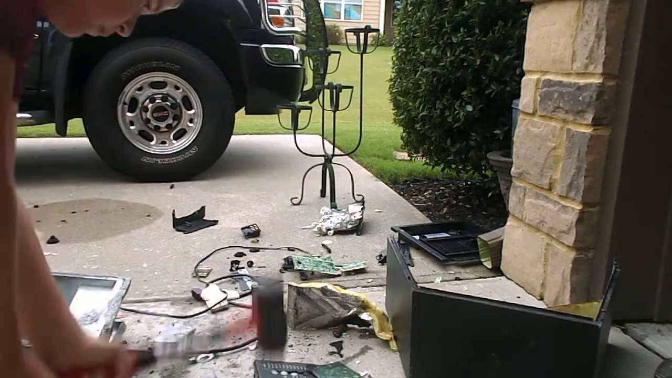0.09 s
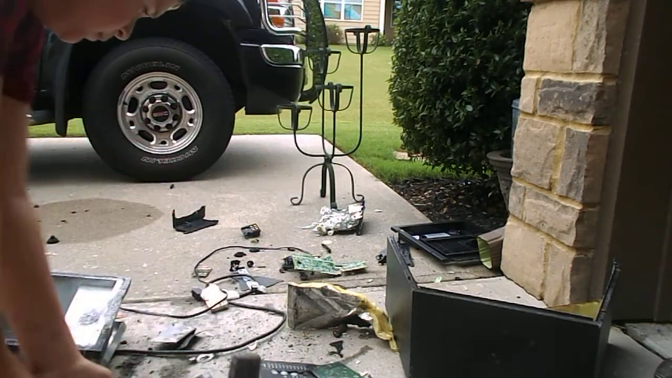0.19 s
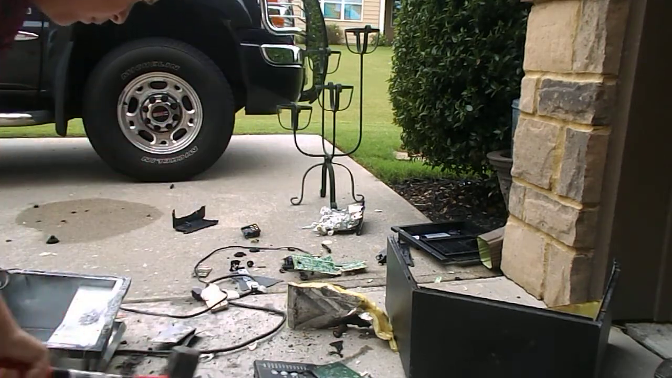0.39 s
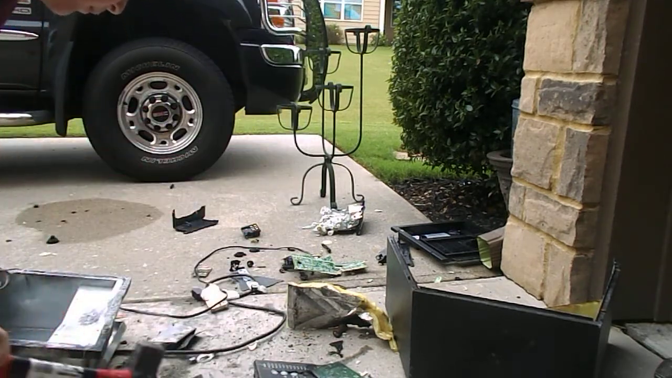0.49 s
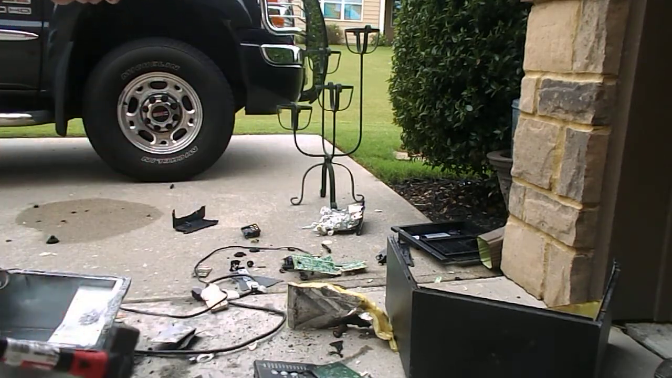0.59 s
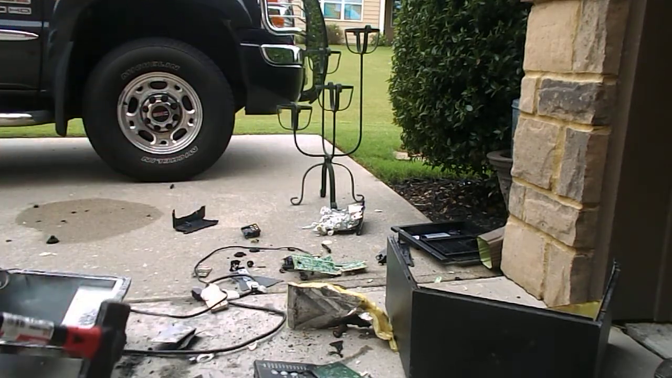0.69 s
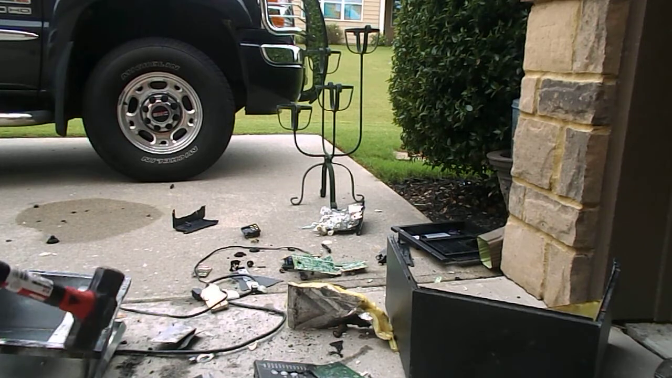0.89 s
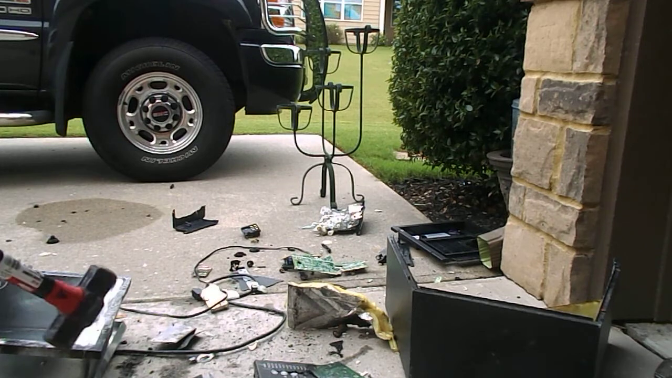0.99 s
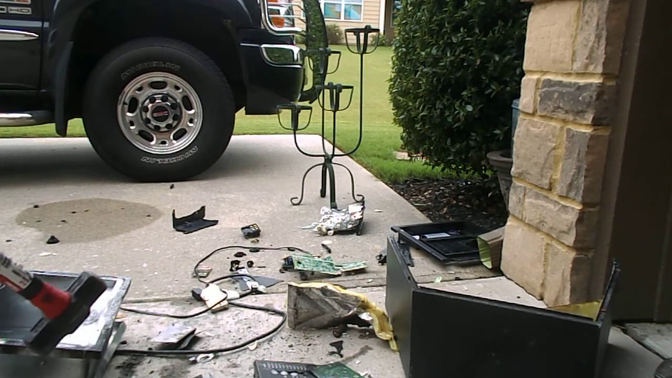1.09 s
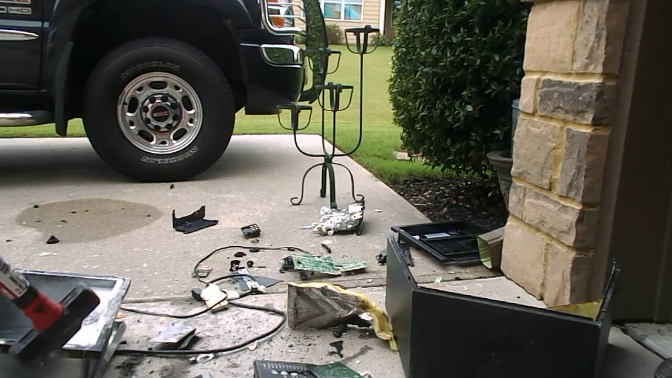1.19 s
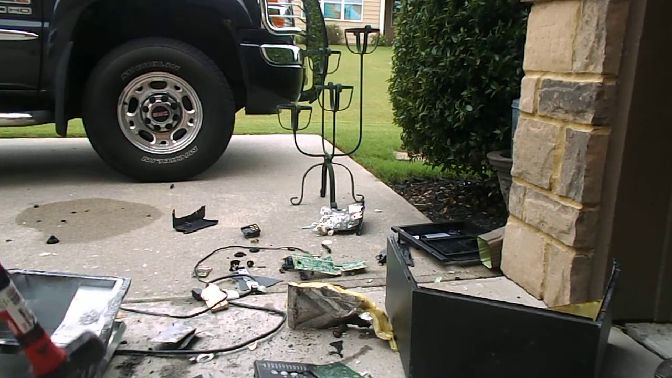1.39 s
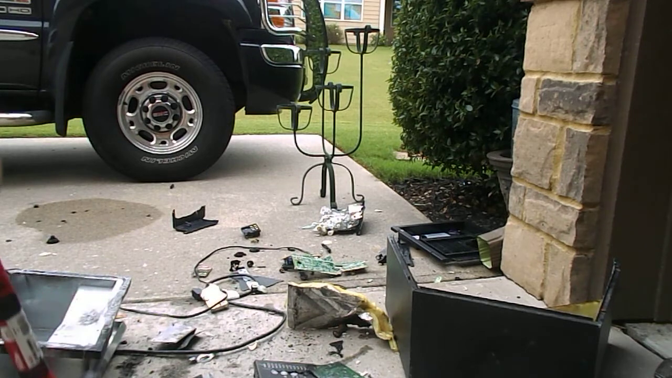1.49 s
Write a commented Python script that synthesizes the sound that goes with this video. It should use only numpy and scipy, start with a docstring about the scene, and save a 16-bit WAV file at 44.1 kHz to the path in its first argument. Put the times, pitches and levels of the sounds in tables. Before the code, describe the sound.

One harsh overloaded hammer blow on sheet metal, then jangling loose parts, over a faint engine idle

```python
"""An engine idles nearby under outdoor hiss and a faint insect band: wavering orders, a hum, coloured noise.
At the start the ring of an earlier blow fades (decaying noise and tones), with one faint knock.
Then a sledgehammer lands on a thin metal housing on concrete: crack, thud and ring, driven into overload.
The housing and loose parts skid and rattle (dense random contacts through the housing's response),
knock (filtered bursts) and ring out; a few faint knocks follow."""
import sys
import numpy as np
from scipy import signal
from scipy.fft import rfft, irfft
from scipy.io import wavfile

SR = 44100
rng = np.random.default_rng(int(sys.argv[2]) if len(sys.argv) > 2 else 0)


def output_pcm(signal):
    """Save a mono or channel-first signal as 16-bit PCM at the path in sys.argv[1].

    Samples are clipped to [-1, 1] before scaling.
    """
    pcm = np.clip(np.atleast_2d(signal).T, -1, 1) * 32767
    wavfile.write(sys.argv[1], SR, np.round(pcm).astype(np.int16))


N = 68355

# background
AIR_DB, AIR_WAVER_DB = -56, 1.3
INSECT_HZ, INSECT_Q, INSECT_DB, INSECT_SWELL_DB = 3900, 12.0, -70, 3.5
ENGINE_HZ, ENGINE_WAVER_DB, HUM_HZ = 23.98, 4, 97.5
EARLIER_DB, EARLIER_T60_S = -44, 0.32
# housing
SPOTS = 6  # contact spots, each with its own response
SPOT_SPREAD_DB = 3
DRY_T60_S, FIELD_DB, STRONG_DB = 0.028, -3.5, -3.5
METAL_GAIN_DB, BASS_CUT_HZ = 2, 231  # gain on the rattle only
# knocks and rattle
KNOCK_T60_S, KNOCK_RING_DB, KNOCK_BROAD = 0.02, -14, 0.096
CONTACTS_PER_S, CONTACT_SPREAD_DB = 5000, 3.5
FLUTTER_DB, FLUTTER_HZ, RATTLE_FADE_S = 1, 61, 0.06
SPLIT_HZ, CLUNK_HZ, CLUNK_CENTRE_HZ = 1870, 550, 323
# blow
BLOW_S, BLOW_DB, BLOW_LENGTH_S, BLOW_RING_DB = 0.2264, 1, 0.0022, -20
BLOW_THUD_DB, BLOW_THUD_HZ, BLOW_THUD_T60_S = -8, 595, 0.0074
# output chain
FILTER_HZ, CLIP, MIC_CUT_HZ, CUTOFF_HZ = 11720, 0.7, 70, 15700

# colour of the housing: (frequency [Hz], density [dB per Hz])
HOUSING_COLOUR = [(60, -50), (150, -33), (300, -23), (600, -13.5), (850, -1.5), (2000, -3), (4000, -3.5),
                  (5500, -9.5), (6500, -17.5), (7600, -18), (9200, -24), (10700, -20.5), (11300, -29.5),
                  (11800, -64)]


def amp(db):
    """dB to gain."""
    return 10 ** (np.asarray(db) / 20)


def rms_one(x):
    """Scale to rms 1."""
    return x / np.sqrt(np.mean(x ** 2) + 1e-20)


def at_hz(points, hz):
    """Read a table on a log-frequency axis."""
    table_hz, values = np.array(points).T[:2]
    return np.interp(np.log(hz + 1), np.log(table_hz), values)


def drift(rate_hz):
    """Smooth random drift, rms 1: white noise through two equal one-pole low-passes."""
    r = np.exp(-2 * np.pi * rate_hz / SR)
    noise = rng.standard_normal(N + SR)
    return rms_one(signal.lfilter([1], [1, -2 * r, r * r], noise)[SR:])  # drop the settling second


def coloured(spectrum, size):
    """Noise with the given colour, rms 1."""
    hz = np.arange(size // 2 + 1) * SR / size
    spectrum_bins = rfft(rng.standard_normal(size)) * amp(at_hz(spectrum, hz))
    return rms_one(irfft(spectrum_bins, size))


def decay(t60_s, size):
    """Exponential fall of 60 dB in t60."""
    return amp(-60 * np.arange(size) / SR / t60_s)


def highpass(x, order, hz):
    """Butterworth bass cut."""
    return signal.sosfilt(signal.butter(order, hz, "high", fs=SR, output="sos"), x)


def air():
    """Outdoor hiss: coloured noise with a slightly wavering level."""
    # (frequency [Hz], density [dB per Hz])
    air_colour = [(20, -10), (45, -8), (80, -4), (180, -6.5), (350, -10.5), (600, -8.5), (1100, -15),
                  (2000, -15.5), (2700, -14), (3300, -17.5), (4000, -14), (5000, -23.5), (6300, -26),
                  (7600, -36), (9300, -36), (11000, -37)]
    return amp(AIR_DB + AIR_WAVER_DB * drift(3.3)) * coloured(air_colour, N)


def insects():
    """Faint far band of hiss near 4 kHz that swells gently: noise through a resonance."""
    band = signal.lfilter(*signal.iirpeak(INSECT_HZ, INSECT_Q, fs=SR), rng.standard_normal(N))
    return amp(INSECT_DB + INSECT_SWELL_DB * drift(3.3)) * rms_one(band)


def engine():
    """Idle: wavering sine orders of an unsteady cycle rate, plus a hum that swells and sinks."""
    # engine orders: (multiple of the cycle rate [1], rms level [dB])
    orders = [(3, -79), (5, -72), (6, -70.5), (7, -68.5), (8, -61.5), (9, -65), (10, -71.5), (12, -70.5),
              (13, -72.5), (16, -69.5), (20, -78.5)]
    # hum: (time [s], rms level [dB])
    hum_levels = [(0, -58), (.12, -70), (.18, -59), (.26, -77), (.37, -55), (.5, -69), (.58, -53),
                  (.85, -55), (.95, -64.5), (1.1, -69), (1.4, -67), (1.55, -54)]
    t = np.arange(N) / SR
    cycle = np.cumsum(ENGINE_HZ * (1 + 0.0149 * drift(3.22))) / SR
    out = np.zeros(N)
    for multiple, db in orders:
        level = amp(db + ENGINE_WAVER_DB * drift(24))
        out += level * np.sin(2 * np.pi * (multiple * cycle + rng.random()))
    hum = amp(np.interp(t, *np.transpose(hum_levels))) * np.sin(2 * np.pi * HUM_HZ * t)
    return np.sqrt(2) * (out + hum)


def earlier():
    """Dying ring of a blow before the start: coloured noise and wavering tones under one decay."""
    # noise colour: (frequency [Hz], density [dB per Hz])
    tail_colour = [(200, -34), (500, -7.5), (900, -2.5), (1500, -1.5), (2200, -5.5), (3800, -2.5),
                   (5500, -9.5), (7000, -14), (11000, -31.5)]
    # ringing tones: (frequency [Hz], initial peak level [dB])
    tail_lines = [(850, -52), (2100, -54.5), (2770, -55), (3690, -50), (3860, -53), (4090, -52.5)]
    t = np.arange(N) / SR
    out = amp(EARLIER_DB) * coloured(tail_colour, N)
    for hz, db in tail_lines:
        out += amp(db + 3 * drift(24.95)) * np.sin(2 * np.pi * (hz * t + rng.random()))
    return out * decay(EARLIER_T60_S, N)


def sines(hz, db, t60_s, size):
    """Decaying sines, random strengths and signs per contact spot; mean energy 1 over the spots."""
    t = np.arange(size) / SR
    rows = np.array([amp(d) / np.sqrt(k) * np.sin(2 * np.pi * f * t) * decay(k, size)
                     for f, d, k in zip(hz, db, t60_s)])  # 1/sqrt(t60): level sets the energy
    shape = (SPOTS, len(hz))
    strengths = amp(SPOT_SPREAD_DB * rng.standard_normal(shape)) * rng.choice([-1, 1], shape)
    out = strengths @ rows
    return out / np.sqrt(np.sum(out ** 2) / SPOTS)


def housing():
    """Response to a contact at each spot: dry click, and ring of dense weak plus a few strong modes."""
    # strong modes: (frequency [Hz], relative energy [dB], t60 [s])
    strong_modes = [(733.7, -9.5, 0.87), (787.6, -3.5, 0.18), (812.5, -6, .42), (1113, -0.5, 0.24),
                    (1173, -7, 0.52), (1244, -4, 0.69), (1302, -3.5, 0.43), (1379, -1, 0.1),
                    (1518, -3.5, .25), (1703, -3.5, 0.17), (1992, -8, 0.22), (2104, -9, .15),
                    (2112, -5, 0.2), (2284, -0.5, 0.24), (2670, -22, 0.203), (3410, -8.5, .25),
                    (4293, -5, 0.18), (4830, -7, 0.05)]
    # decay of the weak modes: (frequency [Hz], t60 [s])
    field_t60 = [(300, 0.407), (700, 0.6), (1300, .45), (2500, 0.19), (5000, 0.096), (11000, 0.11)]
    size = SR // 2
    dry = np.array([coloured(HOUSING_COLOUR, size) for _ in range(SPOTS)]) * decay(DRY_T60_S, size)
    dry = dry / np.sqrt(np.sum(dry ** 2) / SPOTS)
    hz = np.linspace(200, 11900, 600) + rng.uniform(-10, 10, 600)
    field = sines(hz, at_hz(HOUSING_COLOUR, hz), at_hz(field_t60, hz), size)
    strong = sines(*np.transpose(strong_modes), size)
    return dry, amp(FIELD_DB) * field + amp(STRONG_DB) * strong


def knocks(dry, ring):
    """Short bursts around each knock's centre, which also set the housing ringing."""
    # (time [s], burst peak before the bass cut [dB], centre [Hz], sharpness Q [1])
    knock_list = [(.145, -43, 6500, 2.9), (.331, -21, 400, 1), (.416, -10, 2400, 2.), (.4215, -8, 3700, 2.),
                  (.427, -13, 2600, 1.8), (.4555, -4.5, 1300, 1.1), (.558, -11, 1390, 3.2),
                  (.5897, -7, 2010, 4.4), (.612, -10, 2210, 7.2), (.658, -13, 1110, 0.99),
                  (.7165, -15.5, 1300, 2), (.738, -15, 1010, 1.4), (.752, -31, 9500, 2.5),
                  (.812, -40, 9500, 2.5), (.862, -31.5, 3410, 33), (.866, -35, 9000, 2.7),
                  (1.033, -45, 7000, 1.5), (1.283, -53, 5940, 1.5), (1.5186, -42.5, 2200, 2.3)]
    out, size = np.zeros(N + SR), SR // 20
    for k, (s, db, hz, q) in enumerate(knock_list):
        click = dry[k % SPOTS, :size] * decay(KNOCK_T60_S, size)
        burst = signal.lfilter(*signal.iirpeak(hz, q, fs=SR), click) + KNOCK_BROAD * click
        i, rung = int(s * SR), ring[k % SPOTS]
        out[i:i + size] += amp(db) * burst / np.abs(burst).max()
        out[i:i + len(rung)] += amp(db + KNOCK_RING_DB) * rung / np.abs(rung).max()
    return out[:N]


def rattle():
    """Dense uneven contacts dealt to the spots; clunk, body and treble follow their own levels."""
    # (time [s], level [dB], treble re level [dB], low clunks re level [dB])
    rattle_levels = [(0.232, -22.5, 5, -9), (0.236, -35, 10.5, -10), (0.27, -26.5, 2.5, -26),
                     (0.41, -19, -3.5, -24), (0.424, -23, 4, -34), (0.444, -25.5, 0.5, -30),
                     (0.456, -20.5, -3.5, -24), (0.464, -21, 3, -23.5), (0.518, -22.5, -1.5, -26.5),
                     (0.604, -19, -6.5, -28), (0.622, -19, -5, -71), (0.65, -21, -1.5, -20),
                     (0.656, -26.5, 1.5, -26), (0.676, -30.5, -2, -44), (0.712, -31, -1, -29),
                     (0.716, -19.5, -12.5, -22.5), (0.75, -21, -13.5, -61), (0.762, -26.5, -3, -32),
                     (0.794, -28, -12.5, -53), (0.818, -34, -7, -26.5), (0.974, -50.5, -12, -6),
                     (1.0, -55.5, -9, -1.5)]
    t = np.arange(N) / SR
    s, level_db, treble_db, clunk_db = np.transpose(rattle_levels)
    sizes = amp(CONTACT_SPREAD_DB * np.minimum(rng.exponential(1, N), 4)) * rng.choice([-1, 1], N)
    contacts = rms_one(sizes * (rng.random(N) < CONTACTS_PER_S / SR))
    clicks = contacts * (rng.integers(0, SPOTS, N) == np.arange(SPOTS)[:, None])  # one row per spot
    low, lowest = [signal.sosfiltfilt(signal.butter(2, hz, fs=SR, output="sos"), clicks)
                   for hz in (SPLIT_HZ, CLUNK_HZ)]
    parts = [(lowest, clunk_db - at_hz(HOUSING_COLOUR, CLUNK_CENTRE_HZ)),  # undo the weak bass colour
             (low - lowest, 0 * s),
             (clicks - low, treble_db)]
    out = np.zeros((SPOTS, N))
    for part, db in parts:
        out += part * amp(np.interp(t, s, level_db + db) + FLUTTER_DB * drift(FLUTTER_HZ))
    on = (t > BLOW_S) * np.exp(-np.maximum(t - s[-1], 0) / RATTLE_FADE_S)
    return on * out


def blow(ring):
    """The hammer head lands: a crack of a few ms, a low thud and the ring."""
    # tones of the crack: (frequency [Hz], relative amplitude [1])
    crack_tones = [(1500, 0.86), (2250, 0.34), (2800, 0.4), (3500, 0.72), (4250, 0.44)]
    out, i, size = np.zeros(N), int(BLOW_S * SR), SR // 20
    t = np.arange(size) / SR
    attack = np.minimum(t / 0.00045, 1)
    shape = attack * np.exp(-(t / BLOW_LENGTH_S) ** 4) + 0.11 * decay(0.022, size)
    crack = 0.21 * coloured(HOUSING_COLOUR, size)
    for hz, share in crack_tones:
        crack += share * np.sin(2 * np.pi * (hz * t + rng.random()))
    crack = highpass(shape * crack / 2, 3, 1100)
    thud = np.sin(2 * np.pi * BLOW_THUD_HZ * t) * decay(BLOW_THUD_T60_S, size)
    out[i:i + size] = amp(BLOW_DB) * crack + amp(BLOW_THUD_DB) * thud
    out[i:i + len(ring)] += amp(BLOW_RING_DB) * ring / np.abs(ring).max()
    return highpass(out, 2, 150)


def scene():
    """Sum of air, insects, engine, earlier ring, knocks, rattle and blow; one channel."""
    dry, ring = housing()
    rattling = signal.fftconvolve(rattle(), dry + ring, axes=1)[:, :N].sum(axis=0)
    metal = highpass(amp(METAL_GAIN_DB) * rattling + knocks(dry, ring), 4, BASS_CUT_HZ)
    return (air() + insects() + engine() + earlier() + metal + blow(ring[0]))[None]


def record(dry):
    """Treble filter with nulls, hard overload, bass cut, steep top cut."""
    # nulls of the treble filter: (frequency [Hz], width [Hz])
    nulls = [(7000, 1660), (8500, 1060), (10000, 680)]
    x = signal.sosfilt(signal.ellip(10, 1, 70, FILTER_HZ, fs=SR, output="sos"), dry)
    for hz, width_hz in nulls:
        x = signal.lfilter(*signal.iirnotch(hz, hz / width_hz, fs=SR), x)
    x = highpass(np.clip(x, -CLIP, CLIP), 2, MIC_CUT_HZ)
    return signal.sosfilt(signal.cheby2(12, 60, CUTOFF_HZ, fs=SR, output="sos"), x)


dry = scene()
out = record(dry)
output_pcm(out)
```